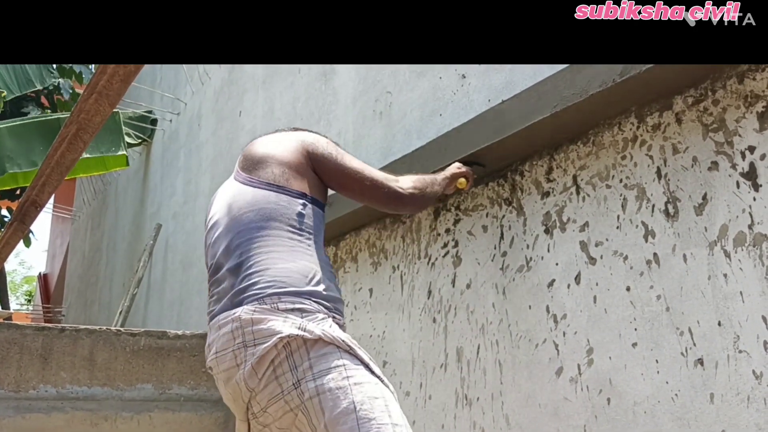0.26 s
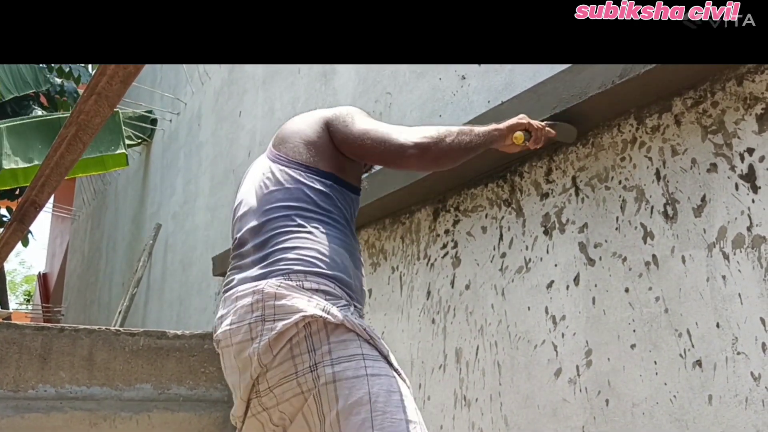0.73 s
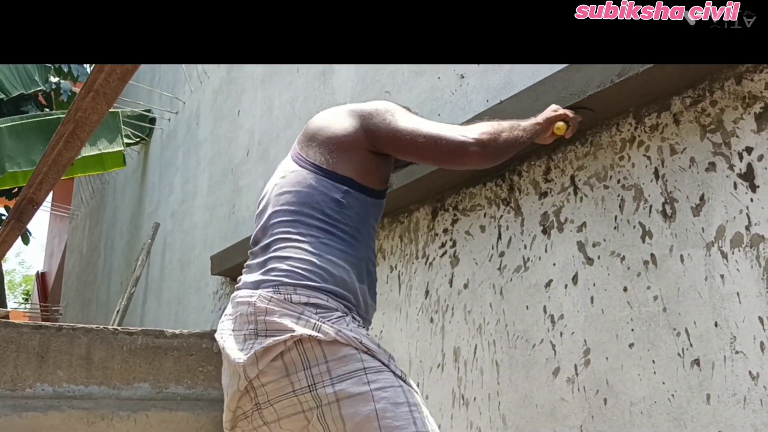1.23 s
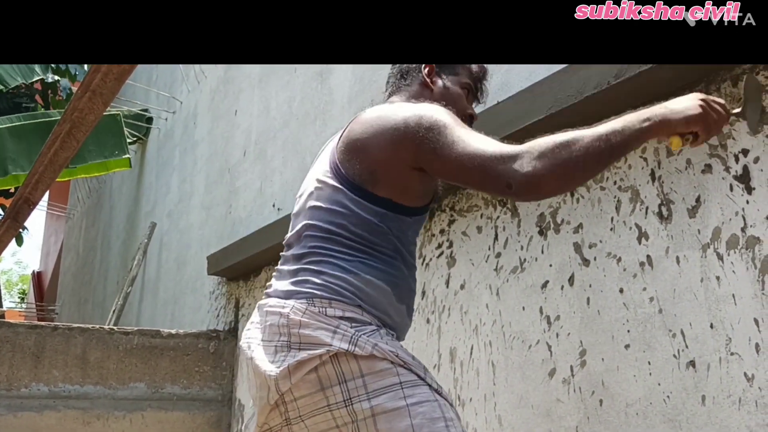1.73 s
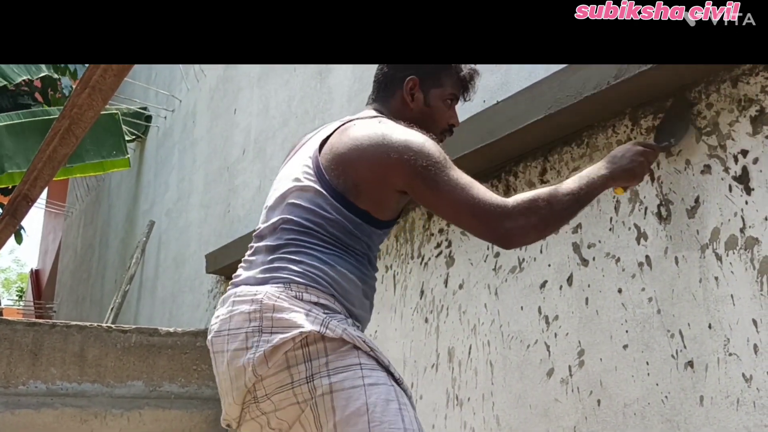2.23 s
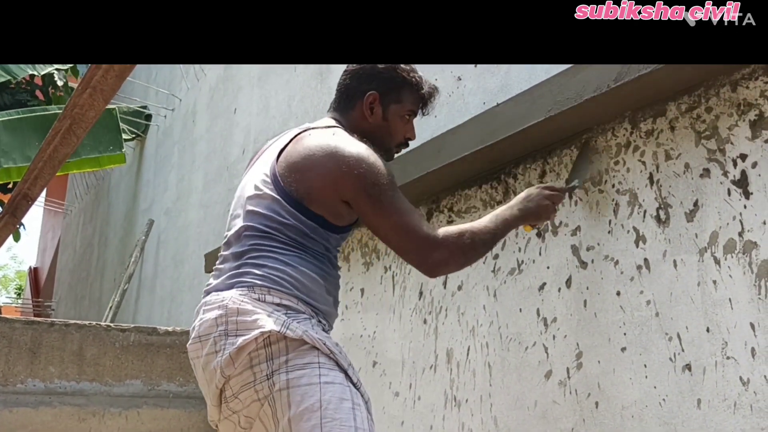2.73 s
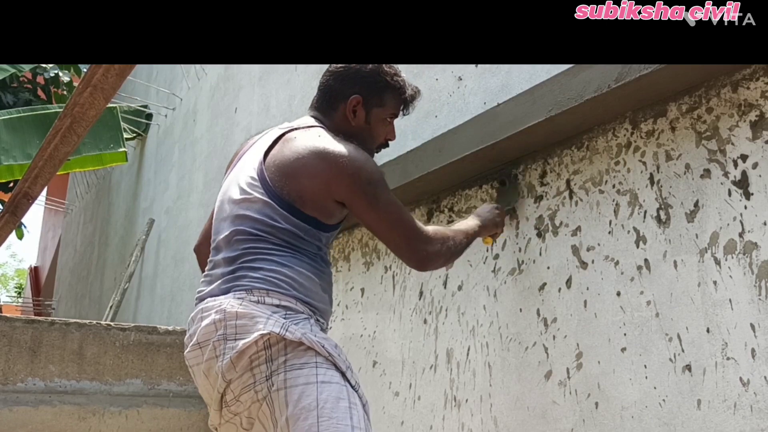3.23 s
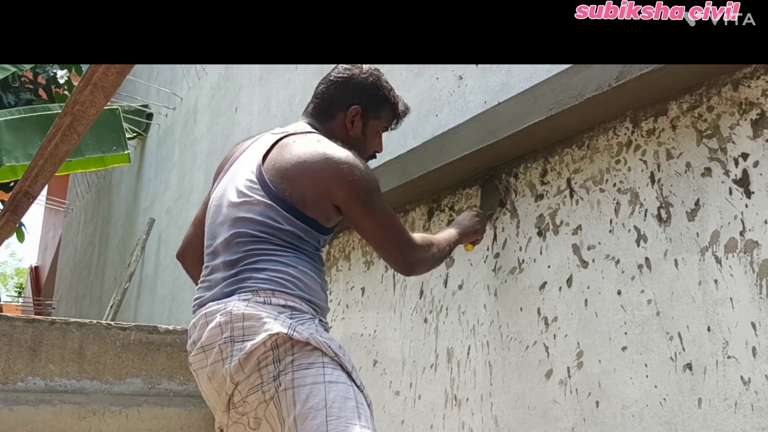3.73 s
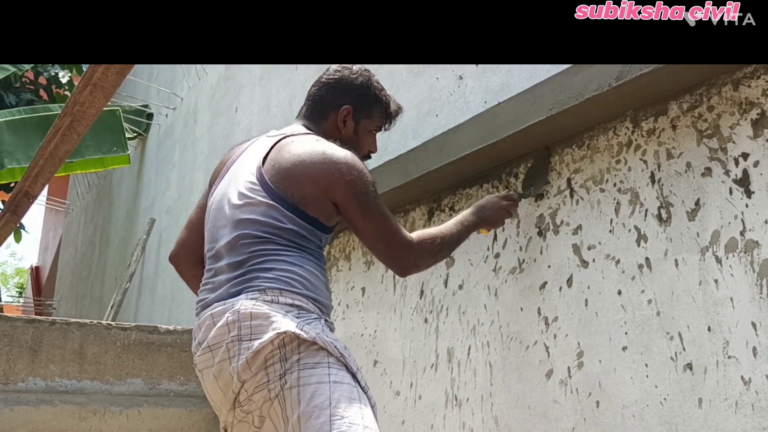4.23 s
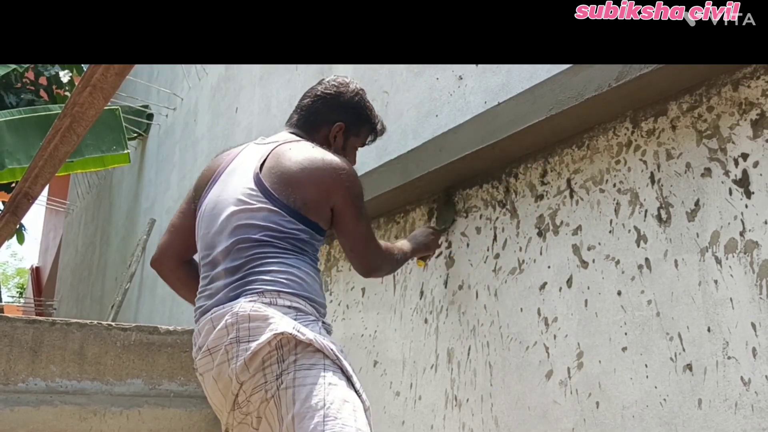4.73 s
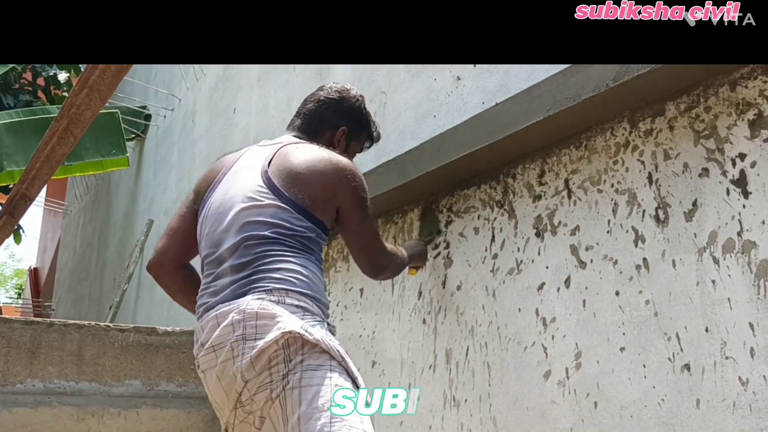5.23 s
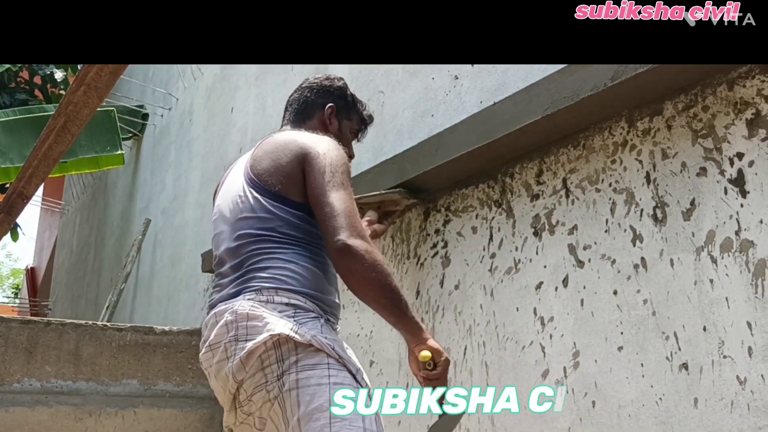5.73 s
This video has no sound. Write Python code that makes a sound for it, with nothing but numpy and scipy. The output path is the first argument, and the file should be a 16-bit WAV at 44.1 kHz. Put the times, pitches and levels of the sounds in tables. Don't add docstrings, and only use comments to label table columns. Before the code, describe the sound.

A steel trowel scrapes gritty wet plaster in separate ringing strokes, then a single-cylinder motorbike swells past over a faint distant town rumble.

```python
import sys
import numpy as np
from scipy import signal
from scipy.fft import rfft, irfft, next_fast_len
from scipy.io import wavfile
from scipy.ndimage import uniform_filter1d, map_coordinates

SR = 44100
rng = np.random.default_rng(int(sys.argv[2]) if len(sys.argv) > 2 else 0)


def dump(signal):
    limited = np.clip(np.atleast_2d(signal).T, -1, 1)
    pcm = np.round(limited * 32767).astype(np.int16)
    wavfile.write(sys.argv[1], SR, pcm)


def ratio_of_db(decibels):
    return 10 ** (np.asarray(decibels, float) / 20)


N = 263718

# [f/Hz, width/Hz, level/dB]
FLEX = [(1128.8, 22, 2.5), (1196.6, 29, 4.5)]
# [f/Hz, width/Hz, level/dB]
EDGE = [(1883, 50, 1), (1965, 57, 4), (2065, 63, 0.5), (2200, 61, 0), (2343, 83, -7)]
# [f/Hz, level per Hz/dB]
MORTAR = [(200, -23), (300, -2.5), (500, -2.5), (800, -5), (1100, -5), (2000, -25.5)]
PASS_S = 5.4


def unit(x):
    return x / np.sqrt(np.mean(x ** 2) + 1e-20)


def along(points, hz):
    f, v = np.transpose(points)
    return np.interp(np.log(hz + 1), np.log(f + 1), v)


def curves(rows):
    s, *cols = np.transpose(rows)
    return [np.interp(np.arange(N) / SR, s, c) for c in cols]


def wobble(rate):
    knots = rng.standard_normal(int(N * rate / SR) + 4)
    return map_coordinates(knots, [np.arange(N) * rate / SR])


def filtered(x, response):
    m = next_fast_len(N + SR // 2)
    return irfft(rfft(x, m) * response(np.fft.rfftfreq(m, 1 / SR)), m)[..., :N]


def ring(x, modes):
    return [(-1) ** k * ratio_of_db(db) * signal.lfilter(*signal.iirpeak(hz, hz / width, SR), x)
            for k, (hz, width, db) in enumerate(modes)]


def rush(spectrum):
    # [f/Hz, likeness from -1 to 1]
    alike = [(60, 1), (180, 1), (550, 0.22), (1650, -0.22), (4970, 0.061), (15000, 0.63)]

    def shares(hz):
        turn = np.arccos(np.clip(along(alike, hz), -1, 1)) / 2
        return ratio_of_db(along(spectrum, hz)) * [np.cos(turn), np.sin(turn)]

    mid, side = filtered(rng.standard_normal((2, N)), shares)
    return unit(np.array([mid + side, mid - side]))


def trowel():
    # [f/Hz, level per Hz/dB]
    sand = [(1500, -46), (4000, -6.5), (5500, -7.5), (8000, -2.5), (9000, -5.5), (11000, -3), (15500, -2)]
    # [f/Hz, level per Hz/dB]
    wet = [(400, -31), (1000, -6.5), (2000, 2), (3200, 6), (4500, -11.5), (7000, -6.5), (12000, -55)]
    # [f/Hz, width/Hz, level/dB]
    tip = [(2860, 94, -11), (3218, 47, 26), (3960, 46, -10), (3960, 190, 15), (4810, 53, 15),
           (5860, 27, -34)]
    # [f/Hz, width/Hz, level/dB]
    twist = [(1434, 32, -3), (1520, 50, -4)]
    # [f/Hz, width/Hz, level/dB]
    handle = [(770, 140, 0)]
    rasp_db, drag_db, edge_db, flex_db, mortar_db = handling()

    force = grit(grain_db=2, clump_db=1.68, patchy_db=2.2)
    x = ratio_of_db(rasp_db + 3.5) * unit(filtered(force, lambda hz: ratio_of_db(along(sand, hz))))
    flat_db = -.9 * np.clip(drag_db, -16, 0) - 19
    sizzle = unit(filtered(force, lambda hz: 1 / (1 + (11000 / (hz + 1)) ** 6)))
    x += ratio_of_db(rasp_db + flat_db) * sizzle

    shake = grit(grain_db=2.0, clump_db=2.2, patchy_db=0)
    drag = unit(filtered(force, lambda hz: ratio_of_db(along(wet, hz)))) + ratio_of_db(-5.0) * blade(shake, tip)
    x += ratio_of_db(rasp_db + drag_db + 1.0) * drag
    x += ratio_of_db(rasp_db + edge_db - 0.5) * blade(shake, EDGE)
    stiff_db = .45 * np.clip(rasp_db + 41.5, -14, 8)
    bend = ratio_of_db(-stiff_db - 0.5) * blade(shake, FLEX[:1]) + ratio_of_db(stiff_db) * blade(shake, FLEX[1:])
    x += ratio_of_db(rasp_db + flex_db - 5) * bend
    x += ratio_of_db(rasp_db + edge_db - 18.5) * blade(shake, handle)
    pressed_db = 0.32 * (rasp_db + 25.0)
    x += ratio_of_db(rasp_db + (flex_db + edge_db) / 2 + pressed_db - 1.4) * blade(shake, twist)

    lumps = grit(grain_db=3.0, clump_db=3.0, patchy_db=3.5)
    x += ratio_of_db(rasp_db + mortar_db) * unit(filtered(lumps, lambda hz: ratio_of_db(along(MORTAR, hz))))
    return x + touch_downs()


def handling():
    # [t/s, pressure/dB, tilt onto the edge/dB]
    flat = [
        [(0.31, -78, 16), (0.38, -43.5, 6), (0.614, -29.5, 0.5), (0.762, -32.5, -1.5), (0.95, -27, 0),
         (1.05, -54.5, -1)],
        [(1.366, -59, 2), (1.464, -40.5, -2.5), (1.63, -28.5, -3), (1.65, -31.5, 0.5), (1.688, -25.5, -0.5),
         (1.788, -30, 12.5), (1.796, -26, 4), (1.882, -43, 0), (1.92, -53, 5.5)],
        [(2.11, -64, -1), (2.164, -56.5, 2.5), (2.22, -80, 0)],
    ]
    # [t/s, pressure/dB, tilt/dB]
    tipped = [
        [(2.369, -45, 8.5), (2.395, -44.5, 2), (2.428, -57, 9.5)],
        [(2.455, -33.5, 4.5), (2.533, -30, -1.5), (2.759, -28.5, 1.5), (2.785, -31.5, 1.5), (2.817, -26, 2),
         (2.911, -28, 0.5), (2.969, -33.5, 1), (3.0, -49, -2.5)],
        [(3.258, -55, 0), (3.26, -41.5, -4.5), (3.346, -29.5, 0), (3.358, -32.5, 0), (3.502, -26, -2),
         (3.624, -26, 1.5), (3.66, -32, -1), (3.71, -48.5, -3.5)],
    ]
    # [t/s, pressure/dB, tilt/dB]
    later_tipped = [
        [(3.912, -59, -2), (3.916, -57.5, -2.5), (4.006, -30, -4), (4.166, -24, 3), (4.194, -32, 2),
         (4.24, -33.5, -3), (4.29, -48.5, -2)],
        [(4.465, -55, -9), (4.469, -32, 1.5), (4.573, -40.5, -0.5), (4.593, -48, -11), (4.695, -31.5, -2.5),
         (5.023, -27.5, 2), (5.041, -24.5, 2.5), (5.145, -26, 3), (5.24, -53.5, 7.5)],
        [(5.555, -49.5, 0), (5.593, -25, -1.5), (5.635, -22, 0.5), (5.703, -30.5, -1), (5.81, -59.5, -0.5)],
    ]
    # [wet drag/dB, edge ring/dB, blade flex/dB, mortar/dB]
    holds = [
        (-9.5, -13.5, -16, -12),
        (-10.5, -16, -26.5, -12.5),
        (10, -1, -19.5, -4),
        (0, -5.5, 13, -20),
        (-5, -1, -5, -19),
        (-1.5, 0.5, -6, -16.5),
        (0.5, 3, -8, -16),
        (-2.5, -1, -9.5, -13.5),
        (-3.5, 1.5, -13.5, -16),
    ]
    light = (0.26, 0.42, 0.2, 0.28)
    lean = (.8, 1.1, -.9, .3)
    firm_db, lift_s, lift_db = -29.5, 0.1604, 27.5
    scoop_db, scoop_s = 9, 0.11

    rows = []
    for stroke, hold in zip([*flat, *tipped, *later_tipped], holds):
        (s0, _, tilt0), (s1, db1, tilt1) = stroke[0], stroke[-1]
        land_s = .05 if stroke in flat else .004
        start = (s0 - land_s, -100, tilt0)
        end = (s1 + lift_s * (s1 - s0 > .1) + .004, db1 - lift_db, tilt1)
        rows += [(*r, *hold) for r in [start, *stroke, end]]
    rasp_db, tilt_db, *hold_db = curves(sorted(rows))

    starts = np.array([[stroke[0][0]] for stroke in [*tipped[1:], *later_tipped]])
    since = np.arange(N) / SR - starts
    scoop = np.sum((since > 0) * np.exp(-np.abs(since) / scoop_s), axis=0)
    hold_db[-1] = hold_db[-1] + scoop_db * scoop
    light_db = np.clip(firm_db - rasp_db, -10, 45)
    layers = [h + a * light_db + b * tilt_db for h, a, b in zip(hold_db, light, lean)]
    return rasp_db - 1.5, *layers


def grit(grain_db, clump_db, patchy_db):
    z = signal.stft(rng.standard_normal((2, N)), nperseg=512)[2]
    field = uniform_filter1d(rng.standard_normal(z.shape[1:]), size=5, axis=0)
    field = uniform_filter1d(field, size=7, axis=1)
    sand = signal.istft(z * ratio_of_db(patchy_db * unit(field)), nperseg=512)[1][:, :N]
    return unit(sand * ratio_of_db(grain_db * wobble(1400) + clump_db * wobble(150) + 0.7 * wobble(35)))


def blade(force, modes):
    return unit(sum(m * ratio_of_db(2 * wobble(5) + 1.5 * wobble(16)) for m in ring(force, modes)))


def touch_downs():
    # [t/s, peak/dB, ring over peak/dB]
    touches = [
        (1.368, -41, -20),
        (1.395, -29.5, 0),
        (2.3696, -29, 22.5),
        (2.4603, -23.5, 21),
        (2.9592, -22, 15),
        (3.262, -21.5, -15),
        (3.9136, -38.5, 19.5),
        (4.4671, -18.5, -8),
    ]
    tick, knock = np.zeros((2, N)), np.zeros((2, N))
    t = np.arange(SR // 10) / SR
    for s, db, ring_db in touches:
        burst = rng.standard_normal((2, 2, len(t))) * (1 - np.exp(-t / 0.00054))
        at = slice(round(s * SR), round(s * SR) + len(t))
        tick[:, at] += ratio_of_db(db - 3 - 60 * t / .025) * burst[0]
        knock[:, at] += ratio_of_db(db + ring_db + 8 - 60 * t / 0.026) * burst[1]
    return tick + sum(ring(knock, FLEX)) + ratio_of_db(-6.5) * sum(ring(knock, EDGE))


def trowel_at_ports():
    # [f/Hz, left minus right/dB]
    ports = [(60, -2), (110, 0.0), (200, 5), (380, -2), (700, -1), (1290, -4), (2380, -1), (4400, -5.5),
             (8120, -2), (15000, 4.5)]
    lag_s, lag_top_hz = 70e-6, 3600
    heel, toe = trowel()
    side = np.array([[.5], [-.5]])
    ends = .83 * heel + .55 * np.array([toe, -toe])
    direct = filtered(ends, lambda hz: np.exp(-2j * np.pi * hz * side * lag_s / (1 + (hz / lag_top_hz) ** 2)))
    return filtered(direct + ratio_of_db(-3.5) * moving(heel), lambda hz: ratio_of_db(side * along(ports, hz)))


def moving(x):
    share = ratio_of_db(9 * np.array([wobble(8) for _ in range(3)]))
    return sum(walls(w * x) for w in share / np.linalg.norm(share, axis=0))


def walls(x):
    # [f/Hz, time/s]
    t60 = [(200, 0.58), (2000, 0.15), (6000, 0.14), (14000, 0.14)]
    hz, t, z = signal.stft(rng.standard_normal((2, SR // 2)), SR, nperseg=256)
    tail = signal.istft(z * ratio_of_db(-60 * t / along(t60, hz)[:, None]), SR, nperseg=256)[1]
    late = np.pad(x, (90, 0))[None]
    return signal.oaconvolve(late, tail / np.linalg.norm(tail[0]), axes=1)[:, :N]


def motorbike():
    # [t/s, firing rate/Hz, throttle and nearness/dB]
    ride = [(0.0, 26.76, -66), (0.56, 27.94, -56), (0.96, 28.94, -43), (1.16, 28.2, -52.5),
            (1.56, 29.7, -53), (1.68, 27.77, -41.5), (1.84, 26.57, -41.5), (2.25, 25.64, -55.5),
            (2.85, 28.47, -48.5), (2.97, 26.27, -51), (3.8, 25.17, -44.5), (4.05, 26.66, -45),
            (4.4, 26.54, -36.5), (4.96, 27.31, -24.5), (5.13, 27.2, -28), (5.45, 27.39, -22.5),
            (5.64, 26.04, -42), (5.95, 25.45, -33)]
    # [f/Hz, level/dB]
    pipe = [(70, -26), (130, -9), (240, -10.5), (300, -33), (355, -17.5), (420, -45), (700, -41)]
    firing_hz, bark_db = curves(ride)
    t = np.arange(N) / SR
    behind = (1 + np.tanh((t - PASS_S - .17) / 0.04)) / 2
    peak_hz = 191.4 + behind * (163.1 - 191.4) + 11 * wobble(5)
    peak_hz += 0.53 * np.clip(bark_db + 48, -20, 12) * (1 - behind)
    boom_db = -54.5 + behind * (-30.5 + 54.5)
    second_db = -62.5 + 0.49 * (bark_db + 47.5) + 1.9 * wobble(3.5)
    turns = np.cumsum(firing_hz) / SR
    scramble = np.clip((-32 - bark_db) / 9, .4, 2)

    def order(k):
        return np.sqrt(2) * np.sin(2 * np.pi * k * turns - .45 * k * k + scramble * wobble(16))

    def gain(hz):
        return ratio_of_db(along(pipe, hz)) + 1 / (1 + ((hz - peak_hz) / 26) ** 2)

    orders = np.arange(5, 19)
    gains = np.array([gain(k * firing_hz) * ratio_of_db(3.2 * wobble(8)) for k in orders])
    gains /= np.linalg.norm(gains, axis=0)
    bark = sum(g * order(k) for g, k in zip(gains, orders))
    boom = np.sqrt(2) * np.sin(8 * np.pi * turns + 0.96 * wobble(20)) * ratio_of_db(2.9 * wobble(12))
    second = np.sqrt(2) * np.sin(4 * np.pi * turns + .6 * wobble(8))
    bike = ratio_of_db(bark_db - 2.1) * bark + ratio_of_db(boom_db - 2.0) * boom + ratio_of_db(second_db + 1.5) * second
    return bike, bark_db


def engine_clatter(bark_db):
    # [f/Hz, level per Hz/dB]
    clatter = [(300, -5), (1000, -9), (2000, 1), (3500, -9), (6000, -18), (12000, -42)]
    return ratio_of_db(0.7 * uniform_filter1d(bark_db, size=SR // 4) - 23) * rush(clatter)


def town():
    # [f/Hz, level per Hz/dB]
    traffic = [(12, -65), (20, -20), (94, -10), (145, 4), (195, -7), (245, 0.5), (303, -23.5), (340, -16),
               (392, -25), (420, -19.5), (600, -20), (780, -69), (1320, -120)]
    # [f/Hz, level per Hz/dB]
    hiss = [(250, 4.5), (500, 0.5), (800, -8), (1500, 1.5), (2000, 3.5), (2600, -4), (5000, -11.5),
            (9000, -17.5), (15000, -36)]
    speed_m_s, pass_m, road_s = 10.5, 3.2, 4.7
    t = np.arange(N) / SR
    near = 1 / (1 + (speed_m_s * (t - PASS_S) / pass_m) ** 2)
    entered = (1 + np.tanh((t - road_s) / 0.14)) / 2
    rumble = (ratio_of_db(-51.5) + entered * ratio_of_db(-43)) * ratio_of_db(2.5 * wobble(9.2)) * rush(traffic)
    air = ratio_of_db(-53.5 + .8 * wobble(5.6)) * rush(hiss)
    tyres = filtered(rush(hiss), lambda hz: 1 / (1 + (hz / 5040) ** 2))
    air += near * ratio_of_db(-34.5 + 4.1 * wobble(14)) * tyres
    chain = (ratio_of_db(-60.5) + near * ratio_of_db(-42.5)) * rush(MORTAR)
    return rumble + air + chain


def far_tools():
    # [t/s, length/s, f/Hz, level/dB]
    chinks = [
        (0, 0.15, 1570, -65),
        (0, 0.12, 1820, -64),
        (0.127, 0.055, 2200, -59),
        (1.18, 0.43, 3320, -64),
    ]
    t = np.arange(N) / SR
    x = np.zeros((2, N))
    for s, length, hz, db in chinks:
        arch = np.sin(np.pi * np.clip((t - s) / length, 0, 1))
        swell = np.sqrt(np.clip(arch, 0, 1))
        x += ratio_of_db(db) * swell * unit(ring(rng.standard_normal((2, N)), [(hz, 40, 0)])[0])
    return x


def scene():
    bike, bark_db = motorbike()
    street = bike + ratio_of_db(-16) * walls(bike) + engine_clatter(bark_db)
    return trowel_at_ports() + street + town() + far_tools()


def top_cut(x):
    return signal.sosfilt(signal.butter(12, 16990, fs=SR, output="sos"), x)


def record(dry):
    def response(hz):
        top = np.clip((15880 - hz) / 250, 0, 1) ** 2
        return top / (1 + (36 / (hz + 1)) ** 3)

    return top_cut(filtered(dry, response))


dry = scene()
out = record(dry)
dump(out)
```